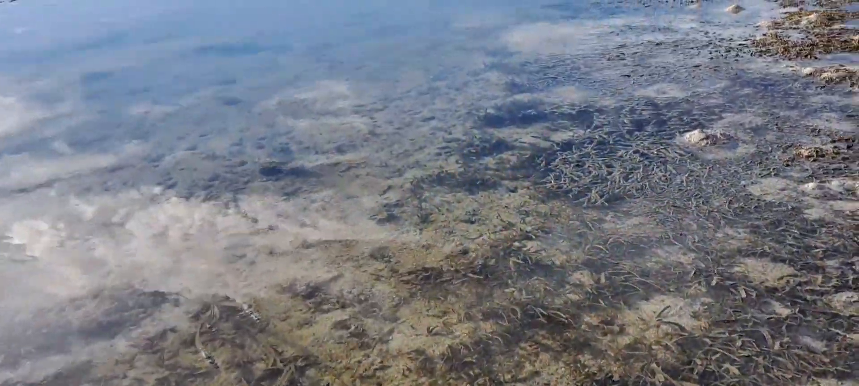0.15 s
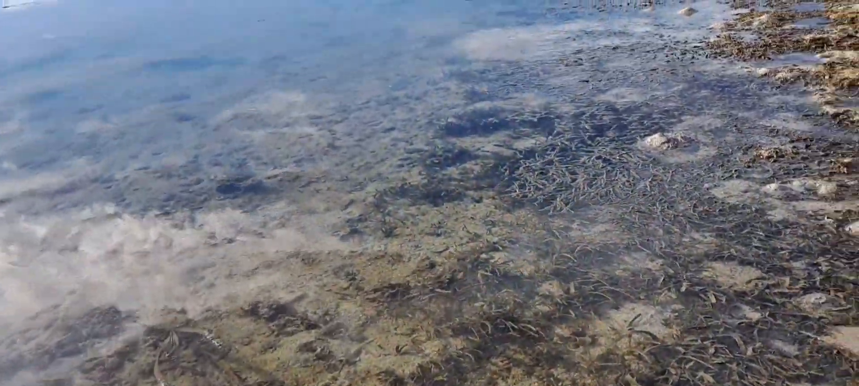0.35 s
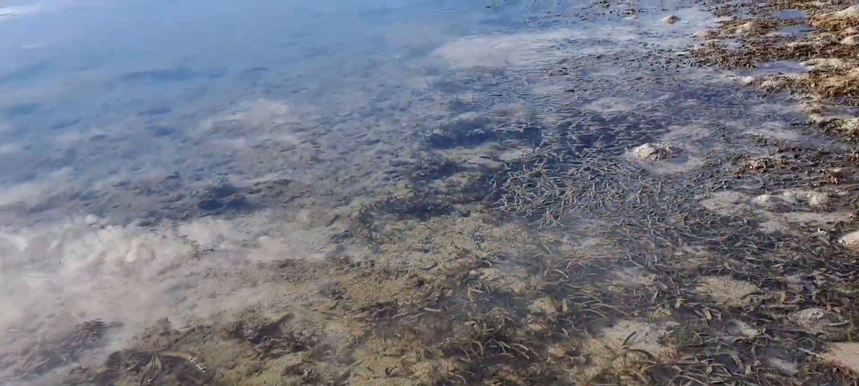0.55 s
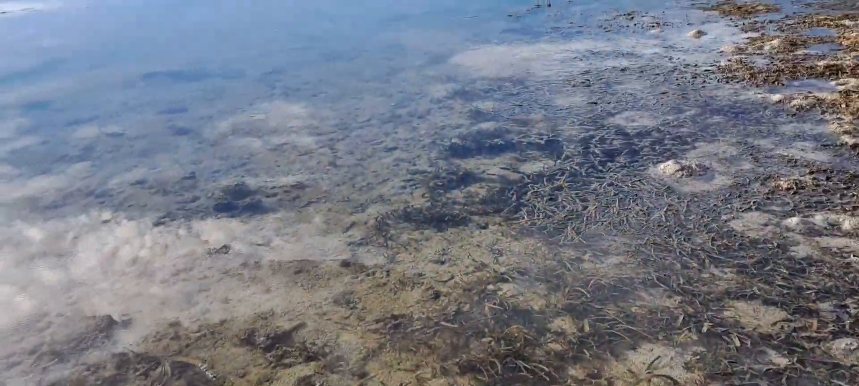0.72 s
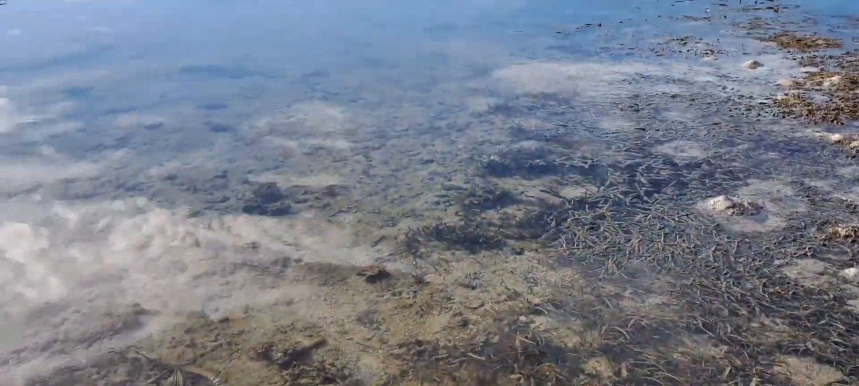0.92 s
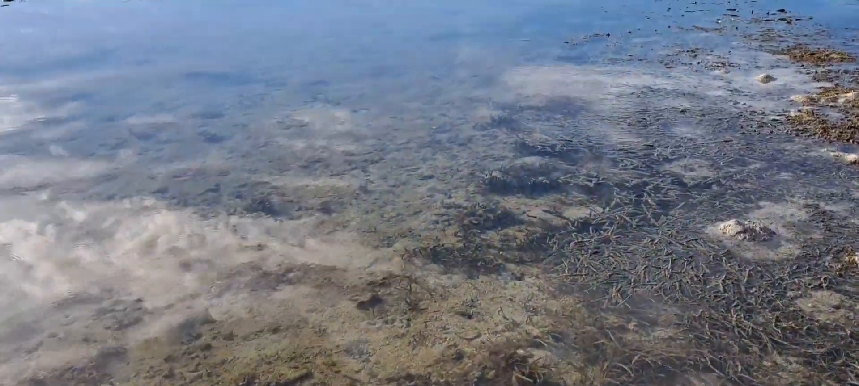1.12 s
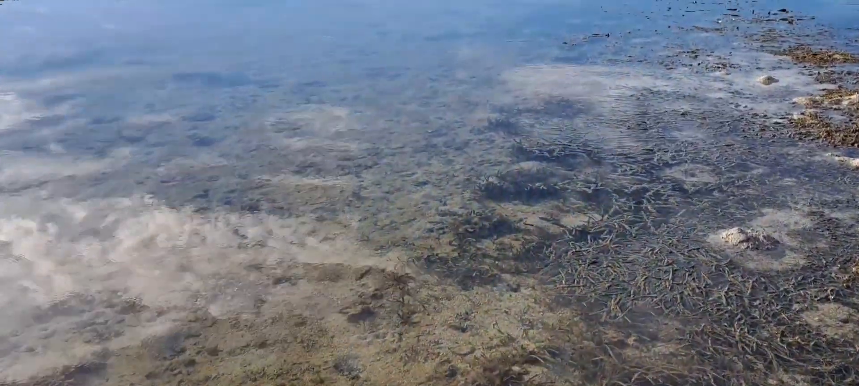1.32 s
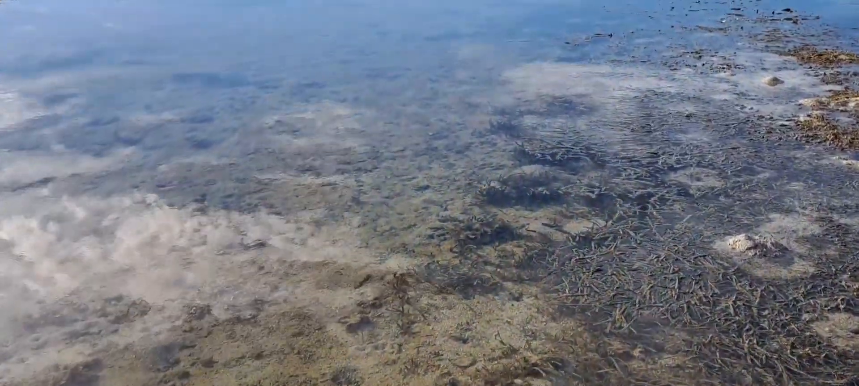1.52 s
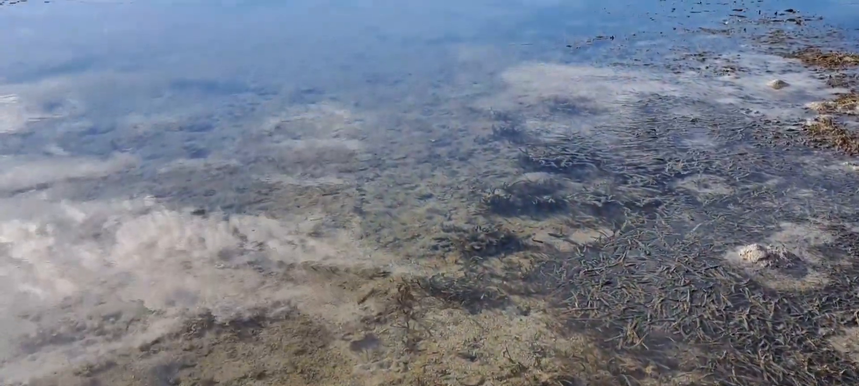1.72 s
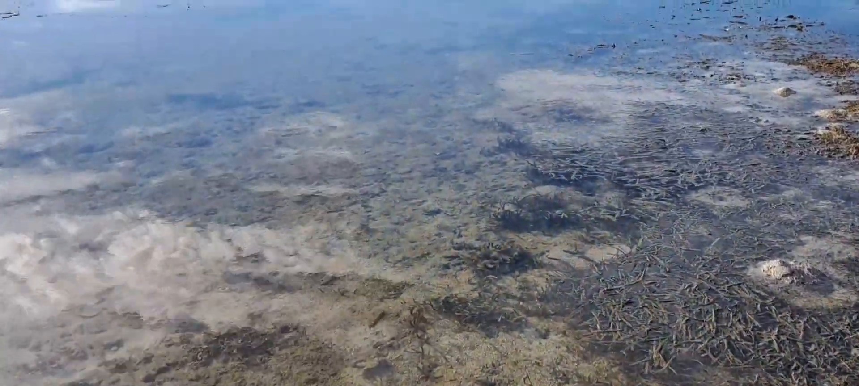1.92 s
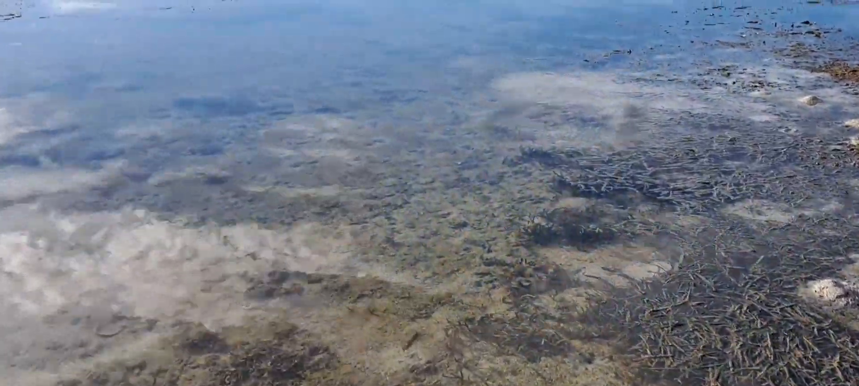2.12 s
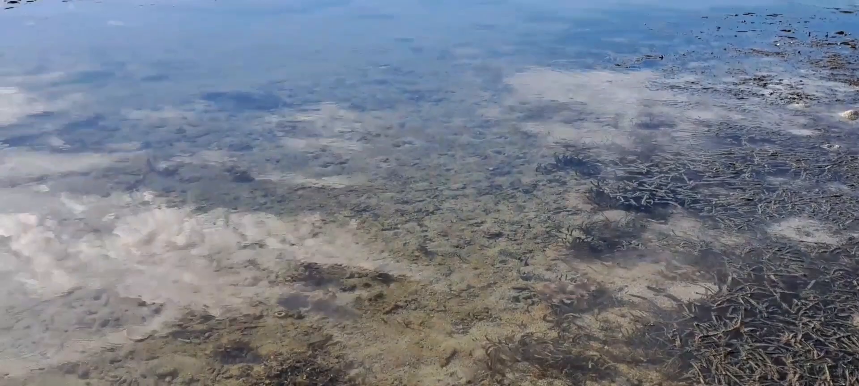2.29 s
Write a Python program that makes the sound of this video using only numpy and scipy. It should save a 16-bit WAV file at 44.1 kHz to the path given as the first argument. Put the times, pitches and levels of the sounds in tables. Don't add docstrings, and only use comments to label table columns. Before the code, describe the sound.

Wading footsteps swish and bubble through quiet shallows, with ticking drops and low air buffets

```python
import sys
import numpy as np
from scipy import signal
from scipy.fft import rfft, irfft, next_fast_len
from scipy.io import wavfile
from scipy.ndimage import uniform_filter1d, map_coordinates

SR = 44100
rng = np.random.default_rng(int(sys.argv[2]) if len(sys.argv) > 2 else 0)


def invert_db(level):
    return 10 ** (np.asarray(level, dtype=float) / 20)


def master(y):
    cut = np.clip(np.atleast_2d(y).T, -1, 1)
    pcm = np.round(cut * 32767)
    wavfile.write(sys.argv[1], SR, pcm.astype(np.int16))


N = 103635

# frequency in Hz, density in dB per Hz.
AIR_COLOUR = [(180, -47), (330, 7.5), (600, -14), (1000, -17), (2790, -5.5), (5800, -12), (8500, -19),
              (16000, -30)]
AIR_DB, TRICKLE_DB = -64.5, 3
# frequency in Hz, density in dB.
RUMBLE_COLOUR = [(30, -10), (65, -6.5), (125, -3), (260, -11.5), (400, -34)]
RUMBLE_DB = -54
RUMBLE_FOLLOWS = 0.075

# centre in seconds, swing in Hz, peak in dB.
LEFT_EDDIES = [(.819, 125, -21), (.834, 112, -20), (.866, 57.3, -14), (.887, 297, -16.5), (.896, 195, -13),
               (.902, 298, -23), (.914, 73, -12.5), (.931, 84.5, -10.5), (.945, 152, -15.5),
               (.96, 71.4, -22.5), (1.0, 56, -29.5), (1.866, 88, -24), (1.8805, 254, -7.5),
               (1.9, 89, -13.5), (1.908, 205, -14.5), (1.918, 111, -15.5), (1.932, 102, -17),
               (1.949, 61.6, -10.5), (1.966, 57.6, -18.5), (2.013, 72.5, -25.5), (2.028, 67, -27),
               (2.053, 72, -26.5), (2.072, 95, -24), (2.097, 69, -33)]
# centre in seconds, swing in Hz, peak in dB.
RIGHT_EDDIES = [
    (2.085, 55, -46),
    (2.12, 54, -35),
    (2.165, 50, -39.5),
]
EDDY_CYCLES, EDDY_LEAD = 0.73, 0.072
EDDY_ROUGH, EDDY_PEAK = 0.31, 0.28
# frequency in Hz, density in dB.
SWIRL_COLOUR = [(25, 1.5), (70, 6.5), (250, -8.5), (600, -24.0), (1500, -81)]

# start in seconds, peak in dB, top (9-15 kHz) over it in dB, left over right in dB.
DROPS = [(0.2647, -28.5, -15, -18), (0.363, -20, -13, -4), (0.6416, -42.5, -1, 5), (0.969, -39, -14, -4.0),
         (1.0003, -34, -21, -4.0), (1.0783, -38.5, -24, -18), (1.1054, -30.5, -26, -8),
         (1.321, -29, -20, -19), (1.3336, -43, -1, -5), (1.6913, -21, -20, -4), (2.0823, -26, -23, -5),
         (2.0965, -24, -22, -15), (2.1116, -28, -13.5, -10), (2.1907, -35, -48, -7),
         (2.2015, -32.5, -29, -15.5)]
DROP_T60_S, DROP_TOP_T60_S, DROP_RISE_S = 0.017, 0.023, 0.00061
# start in seconds, peak in dB.
SPECKS = [(0.0094, -32), (0.113, -35), (0.1357, -36.5), (0.1669, -43), (0.177, -37), (0.218, -43),
          (0.2824, -53), (0.3136, -52), (0.345, -36), (0.394, -46), (0.4632, -46), (0.537, -36),
          (0.792, -33), (0.8864, -33), (1.036, -48), (1.6755, -38), (1.7603, -45), (1.7758, -41),
          (1.8351, -37), (1.9075, -28), (1.925, -29), (1.9633, -32), (1.9898, -43), (2.0741, -40)]
SPECK_DB, SPECK_PAN_DB, SPECK_T60_S = 11, -2, 0.004
# frequency in Hz, gain in dB.
DROP_BODY = [(900, -7), (3000, -4.5), (6000, -8.5), (8500, -17), (12000, -64)]
DROP_TOP = [(5000, -30), (9000, -12.5), (13000, -3.5), (16000, -14)]

# start in seconds, pitch in Hz, peak in dB, life in cycles.
BUBBLES = [(0.4562, 2300, -27, 6.9), (0.227, 361, -32, 14), (.25, 777, -42.5, 16), (.34, 1940, -31, 8.9),
           (0.211, 1360, -44, 17), (0.489, 450, -39.5, 31), (.5, 770, -32, 4.5), (.545, 643, -26.5, 10.9),
           (0.606, 740, -29.5, 5.5), (0.611, 1170, -34, 12.5), (.683, 527, -30.5, 9.2),
           (.68, 1250, -31.5, 16), (.718, 505, -37, 6.4), (.755, 437, -30.5, 5), (0.901, 1427, -38.5, 13),
           (.932, 1200, -27, 4.3), (.933, 790, -37, 8.7), (0.97, 1006, -36.5, 10.3),
           (1.077, 1030, -44.5, 2.9), (1.294, 860, -41, 3.3), (1.321, 475, -34, 2.6), (1.417, 1440, -32, 8),
           (2.061, 1440, -31, 12.6), (2.13, 830, -42, 14.4), (2.161, 1420, -40, 10.2)]
# start in seconds, pitch in Hz, peak in dB, life in cycles.
PINGS = [(1.294, 3000, -36.5, 8.2), (1.322, 2860, -29.5, 9.3), (1.325, 3400, -25.5, 6.6),
         (1.6934, 5690, -17.5, 15.3), (1.901, 2400, -25.5, 8.3), (2.114, 4500, -28, 4.9),
         (0.925, 3240, -34, 5.3), (0.116, 1810, -44, 9), (.129, 1820, -43, 11), (.1805, 2950, -35, 13),
         (.253, 1850, -41.5, 8.4), (0.3264, 2750, -34, 9.9), (0.339, 1370, -40, 13),
         (0.373, 1100, -48, 5.4), (.586, 1970, -40, 6), (.62, 3250, -37, 11), (.766, 4800, -31, 5),
         (.793, 2350, -36, 8), (0.8438, 1350, -37.5, 6.7), (.85, 2400, -34, 11), (1.5588, 2630, -37, 14),
         (1.8044, 1630, -31.5, 6.8), (1.946, 1720, -28, 5.5), (1.946, 2487, -32.5, 39),
         (1.97, 2590, -35.5, 34), (2.048, 5100, -37, 10), (2.083, 5000, -31.5, 7.9),
         (2.155, 3380, -44.5, 10.5), (2.1824, 2000, -45.5, 3.5), (2.191, 5900, -35, 6.8),
         (2.202, 5230, -44, 7)]
# start in seconds, pitch in Hz, peak in dB,
# life in cycles, pitch gain over a life.
GULPS = [(1.364, 450, -36.5, 20, .5), (1.572, 580, -37, 23.5, 0.506), (1.497, 780, -40, 15.4, 0.21),
         (1.668, 720, -35, 9.4, 0.11), (2.0, 680, -40, 21.4, 0.205), (1.598, 1220, -40, 19.7, .3),
         (1.455, 390, -42.5, 13, .15), (.655, 480, -37, 13.6, 0.21), (0.52, 780, -38, 18, .15),
         (.738, 383, -36.5, 8.7, 0.21), (.258, 300, -36, 17.5, 0.406), (.376, 320, -42.5, 18.3, 0.288)]
BUBBLE_RISE = 0.17
BUBBLE_START, BUBBLE_FADE = 11, 1.7
MATE_S, MATE_SPREAD, MATE_DB = 0.014, 0.196, -6.5
WAVER_DB = 4

# time in seconds, push in dB, spray in dB.
STRIDE = [(0, -52, -53), (.22, -45, -55.5), (.3, -44, -54), (.46, -43, -52.5), (.53, -37.5, -52.5),
          (.74, -42.5, -50.5), (0.933, -45, -50.5), (1.02, -70, -67.5), (1.28, -60, -63.5),
          (1.345, -46.5, -51), (1.55, -43, -48), (1.67, -45.5, -54), (1.773, -41, -46),
          (2.028, -39.5, -44.5), (2.06, -59, -58.5), (2.105, -47, -51.5), (2.14, -57, -61),
          (2.24, -72, -73)]
CHANGE_S = [
    1.257,
    1.604,
]
# frequency in Hz, density in dB per Hz.
SLOSH_COLOUR = [(200, -30.5), (420, 0), (700, -2.5), (1400, -5), (2000, -14.5), (4000, -73)]
# frequency in Hz, density in dB per Hz.
SPRAY_COLOURS = [
    [(710, -22), (1200, -11.5), (2400, -6), (4000, -11.5), (5410, -9), (9110, -27), (12900, -17.5),
     (16000, -32)],
    [(710, -19), (1200, -28), (2060, -8.5), (3550, -1), (5410, -6.5), (9310, -26), (13200, -18.5),
     (16000, -41.5)],
    [(800, -8.5), (2000, -5.5), (2500, 0), (4300, -8), (5600, -3.5), (8800, -23.5), (13000, -14.5),
     (16000, -26)],
]
SURGE_DB, SWELL_DB = 0.9, 0.9
FIZZ_SCATTER_DB, CALM_DB = 3.3, 2.2

# frequency in Hz, left over right in dB.
LEAN = [
    [(400, 0), (1300, -3.5), (4400, -10.5), (8000, -2), (15000, -4.5)],
    [(700, 1), (2400, -5.5), (4400, -18.5), (8000, -3.5), (15000, -3)],
]
# frequency in Hz, left-right likeness.
ALIKE = [(300, 0.89), (700, 0.92), (1500, 0.17), (4000, 0.074), (12000, 0.12)]
LAG_S = .0001
TOP_HZ = 15900


def unit(x):
    return x / np.sqrt(np.mean(x ** 2) + 1e-20)


def along(points, hz):
    f, v = np.transpose(points)
    return np.interp(np.log(hz + 1), np.log(f + 1), v)


def wobble(rate):
    return map_coordinates(rng.standard_normal(int(N * rate / SR) + 4), [np.arange(N) * rate / SR])


def filtered(x, response):
    m = next_fast_len(N + 8192)
    return irfft(rfft(x, m) * response(np.fft.rfftfreq(m, 1 / SR)), m)[..., :N]


def coloured(x, points):
    return filtered(x, lambda hz: invert_db(along(points, hz)))


def flat(x):
    hz, power = signal.welch(x, SR, nperseg=256)
    return filtered(x, lambda f: np.interp(f, hz, power + 1e-3 * power.mean()) ** -.5)


def patchy(depth_db):
    z = signal.stft(rng.standard_normal(N), nperseg=256)[2]
    field = uniform_filter1d(rng.standard_normal(z.shape), 5, 0)
    field = uniform_filter1d(field, 8, 1)
    return unit(signal.istft(z * invert_db(depth_db * unit(field)), nperseg=256)[1][:N])


def ports(a, b, lean):
    def angle(hz):
        return np.arccos(np.clip(along(ALIKE, hz), -1, 1)) / 2

    def share(hz):
        tilt = invert_db(along(lean, hz) / 2) * np.exp(-1j * np.pi * hz * LAG_S)
        return np.array([tilt, 1 / tilt]) * 2 / (abs(tilt) + 1 / abs(tilt))

    mid, side = filtered(np.array([a, b]), lambda hz: np.array([np.cos(angle(hz)), np.sin(angle(hz))]))
    return filtered(np.array([mid + side, mid - side]), share)


def by_leg(*stages):
    out = stages[0]
    for s, stage in zip(CHANGE_S, stages[1:]):
        out = out + (stage - out) * np.clip((np.arange(N) / SR - s) * 10 + .5, 0, 1)
    return out


def blips(s, hz, size, cycles, rise, count):
    k = np.arange(count)
    u = k / SR * (hz / cycles)[:, None]
    onset = 1 - np.exp(-BUBBLE_START * u)
    decay = np.exp(-BUBBLE_FADE * u * (1 + u) / 2)
    phase = 2 * np.pi * cycles[:, None] * (u + rise * u * u / 2)
    wave = size[:, None] * 1.65 * onset * decay * np.sin(phase)
    place = np.round(s * SR).astype(int)[:, None] + k
    return np.bincount(place.ravel(), wave.ravel(), N + count)[:N]


def swarm(centre_hz, spread, cycles, scatter_db, count, size):
    s, pitch, big = rng.random((count, 3)).T
    hz = np.clip(centre_hz * np.exp(spread * (2 * pitch - 1)), 200, 17000)
    level = invert_db(-scatter_db * np.log(1.02 - big))
    return unit(blips(s * (N - 1) / SR, hz, level, np.full(count, cycles), BUBBLE_RISE, count=size))


def shore():
    a, b = [unit(coloured(patchy(depth_db=5.0), AIR_COLOUR)) for _ in "ab"]
    c, d = [unit(filtered(rng.standard_normal(N), lambda hz: invert_db(along(RUMBLE_COLOUR, hz)) * (hz < 500)))
            for _ in "ab"]
    s, push_db, _ = np.transpose(STRIDE)
    shake_db = RUMBLE_FOLLOWS * np.interp(np.arange(N) / SR, s, push_db - push_db.mean())
    rumble = invert_db(RUMBLE_DB + shake_db + 2.0 * wobble(25.25))
    far = invert_db(AIR_DB + TRICKLE_DB * wobble(21.66) + 1.6 * wobble(90))
    return ports(far * a + rumble * c, far * b + rumble * d, LEAN[0])


def buffet(eddies):
    t, out, reach = np.arange(N) / SR, np.zeros(N), np.zeros(N)
    for s, hz, db in eddies:
        bell = invert_db(db) * np.exp(-((t - s) * hz / EDDY_CYCLES) ** 2)
        phase = 2 * np.pi * (hz * (t - s) + EDDY_LEAD)
        out += bell * (np.cos(phase) + EDDY_PEAK * np.cos(2 * phase))
        reach += bell
    swirl = coloured(rng.standard_normal(N), SWIRL_COLOUR)
    return out + EDDY_ROUGH * uniform_filter1d(reach, 400) * unit(swirl)


def drops():
    body, top, t = np.zeros((2, N + 900)), np.zeros((2, N + 900)), np.arange(800) / SR
    for s, db, top_db, pan_db in DROPS:
        noise = rng.standard_normal(800) + 1.03 * rng.standard_normal((2, 800))
        tick = noise * invert_db(db - 60 * t / DROP_T60_S) * (1 - np.exp(-t / DROP_RISE_S))
        body[:, round(s * SR):][:, :800] += tick * invert_db([[pan_db / 2], [-pan_db / 2]])
        top[:, round(s * SR):][:, :800] += tick * invert_db(top_db + 18 + pan_db / 4 - 60 * t / DROP_TOP_T60_S)
    for s, db in SPECKS:
        speck = rng.standard_normal((2, 800)) * invert_db(db + SPECK_DB - 60 * t / SPECK_T60_S)
        top[:, round(s * SR):][:, :800] += speck * invert_db([[SPECK_PAN_DB / 2], [-SPECK_PAN_DB / 2]])
    return coloured(body[:, :N], DROP_BODY) + coloured(top[:, :N], DROP_TOP)


def bubbles():
    rows = np.array(BUBBLES)
    pitch = rows[:, 1]
    mate_db = MATE_DB - 20 * ((pitch < 400) | (pitch > 1400))
    late, off = rng.random((2, 2, len(rows)))
    mates = []
    for a, b in zip(late, off):
        shift = [MATE_S * 3 * a, pitch * MATE_SPREAD * (2 * b - 1), mate_db, 0 * a]
        mates.append(rows * [0.98, 1, 0.99, 0.74] + np.transpose(shift))
    s, hz, db, cycles = np.vstack([rows, PINGS] + mates).T
    rise = BUBBLE_RISE * np.clip(900 / hz, 0, 1)[:, None]
    ringing = blips(s, hz, invert_db(db), cycles, rise, count=4000)
    s, hz, db, cycles, rise = np.transpose(GULPS)
    ringing = ringing + blips(s, hz, invert_db(db), cycles, rise[:, None], count=4000)
    ringing = ringing * invert_db(WAVER_DB * wobble(190) - 2.5)

    def balance(lean):
        return lambda f: 2 * invert_db(along(lean, f) * [[1], [0]]) / (1 + invert_db(along(lean, f)))
    return by_leg(*[filtered(ringing, balance(lean)) for lean in LEAN])


def wading():
    s, push_db, spray_db = np.transpose(STRIDE)
    t = np.arange(N) / SR
    surge = wobble(31.8)
    gurgle, fizz = [], []
    for _ in "ab":
        churn = swarm(803.6, 1.184, 6.9, 2.84, count=1500, size=1200) + 1.14 * patchy(depth_db=0.5)
        gurgle.append(unit(coloured(flat(churn), SLOSH_COLOUR)))
    for _ in "ab":
        froth = swarm(6050, 1.346, 4.27, FIZZ_SCATTER_DB, count=12000, size=200)
        fizz.append(flat(froth + 0.95 * patchy(depth_db=CALM_DB)))
    low = invert_db(np.interp(t, s, push_db) + SWELL_DB * wobble(20.54) + SURGE_DB * surge)
    high = invert_db(np.interp(t, s, spray_db) + 7.5 + SURGE_DB * surge + 1.3 * wobble(70))
    stages = []
    for colour, lean in zip(SPRAY_COLOURS, [LEAN[0], LEAN[1], LEAN[1]]):
        a, b = [low * g + high * unit(coloured(f, colour)) for g, f in zip(gurgle, fizz)]
        stages.append(ports(a, b, lean))
    return by_leg(*stages)


def scene():
    air = np.array([buffet(LEFT_EDDIES), buffet(RIGHT_EDDIES)])
    return wading() + bubbles() + drops() + air + shore()


def top_cut(x):
    return signal.sosfilt(signal.butter(12, 16820, fs=SR, output="sos"), x)


def record(dry):
    mix = filtered(dry, lambda hz: (hz < TOP_HZ) * hz ** 2 / (hz ** 2 + 28 ** 2))
    return top_cut(mix)


dry = scene()
out = record(dry)
master(out)
```